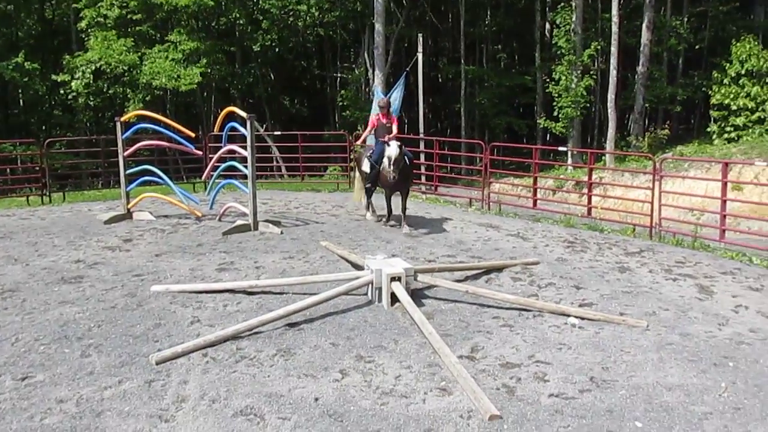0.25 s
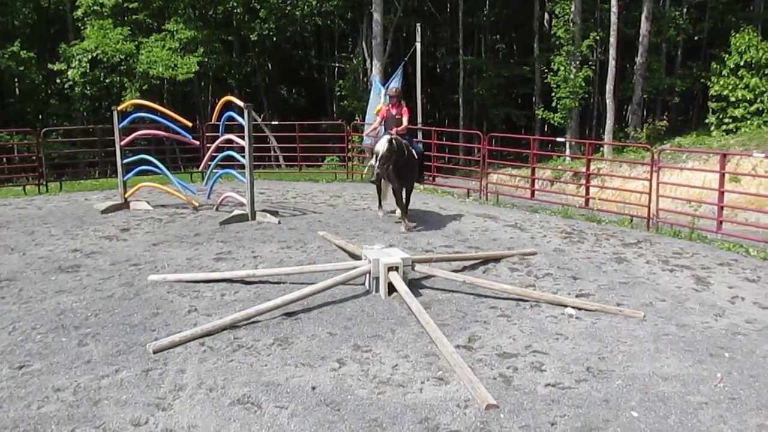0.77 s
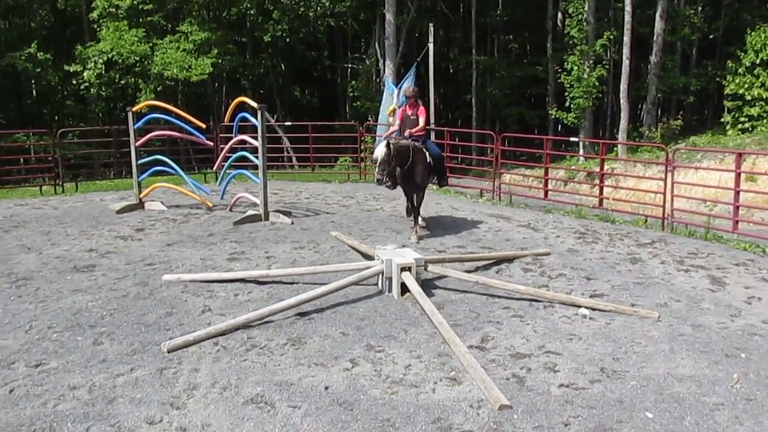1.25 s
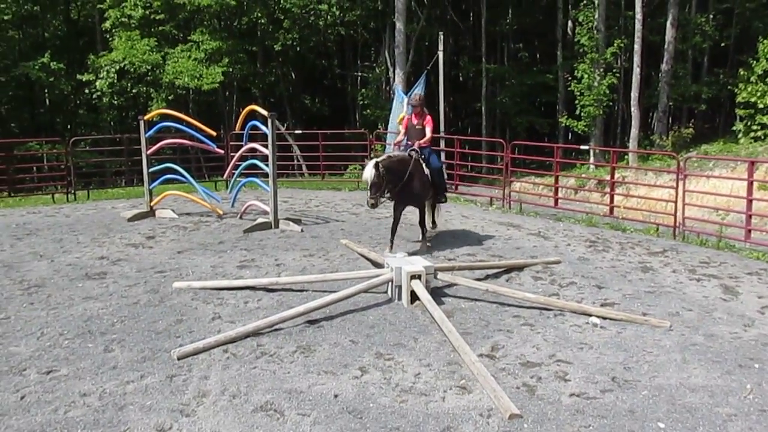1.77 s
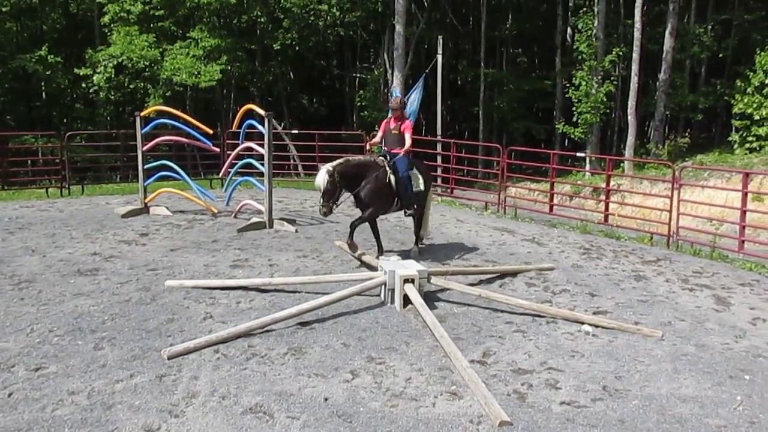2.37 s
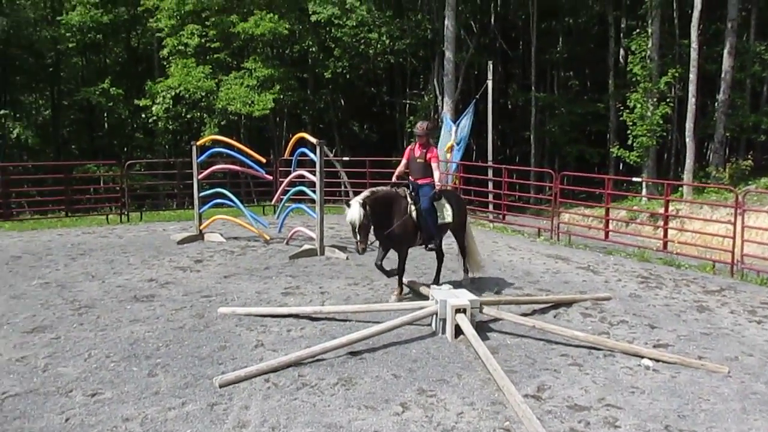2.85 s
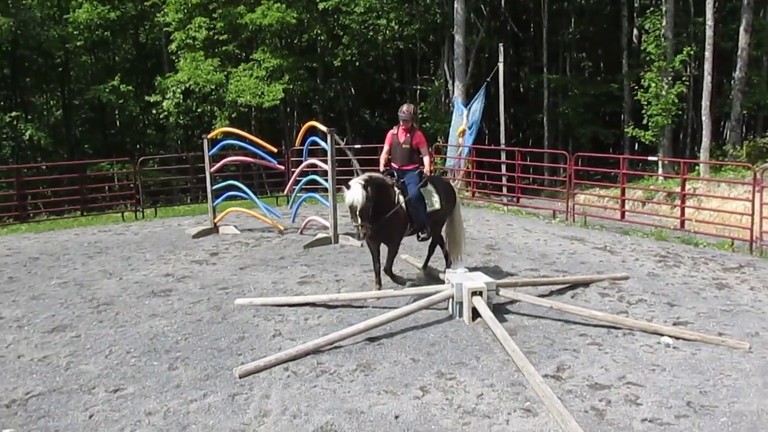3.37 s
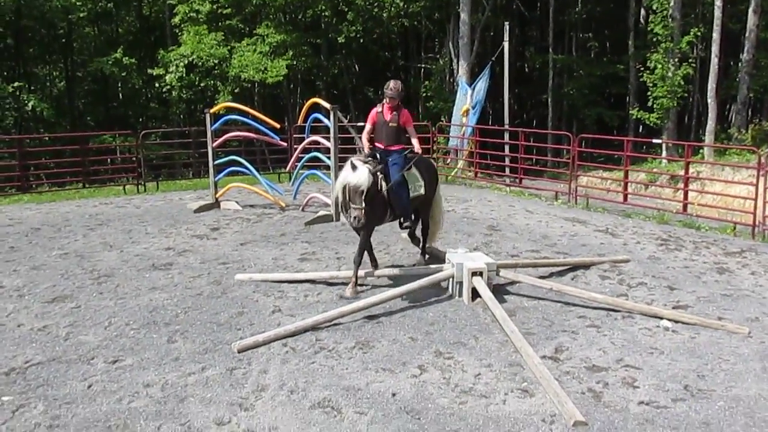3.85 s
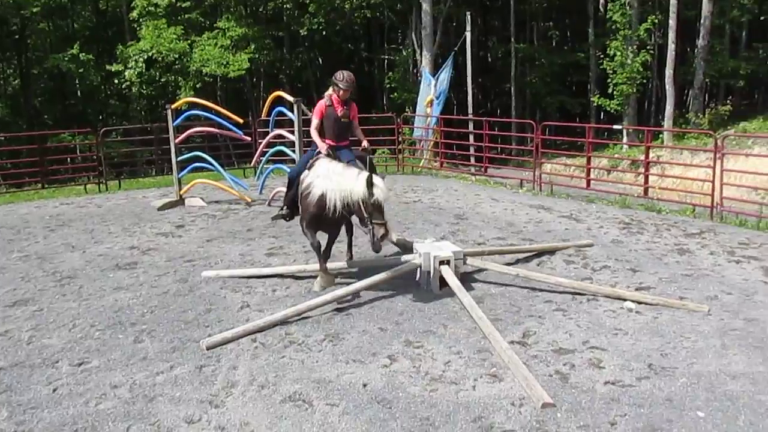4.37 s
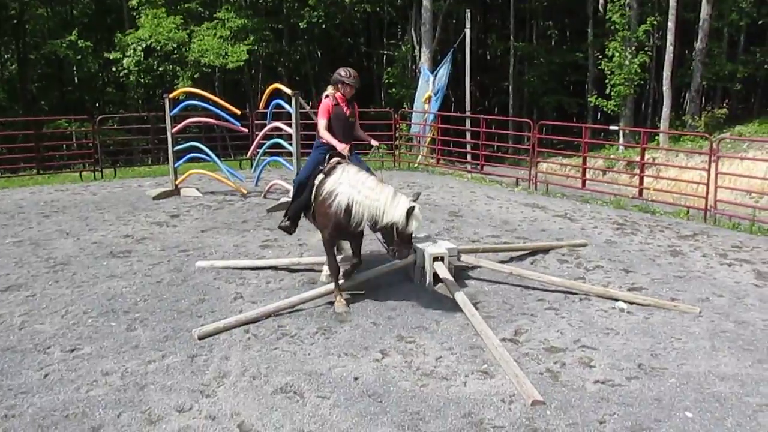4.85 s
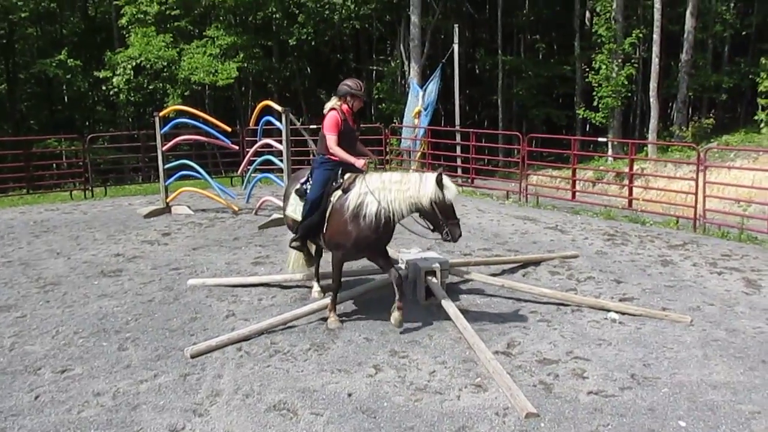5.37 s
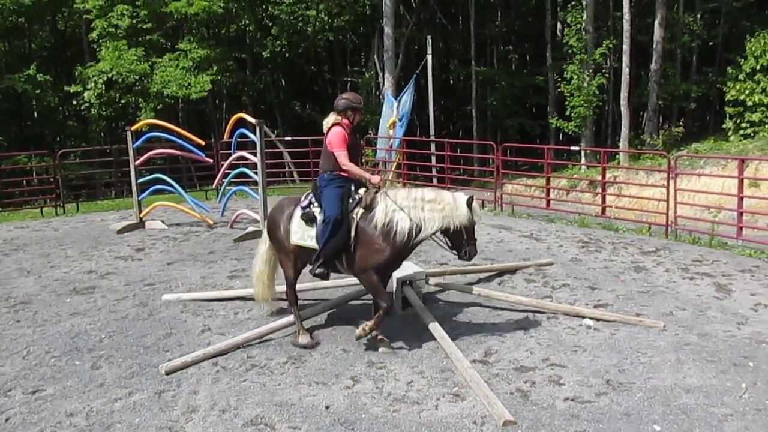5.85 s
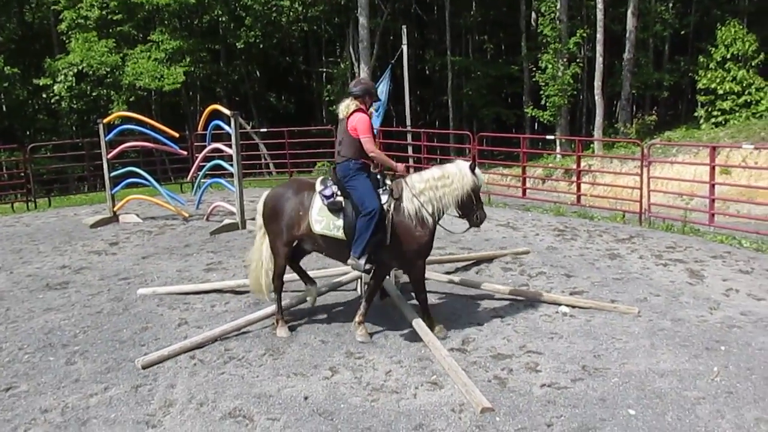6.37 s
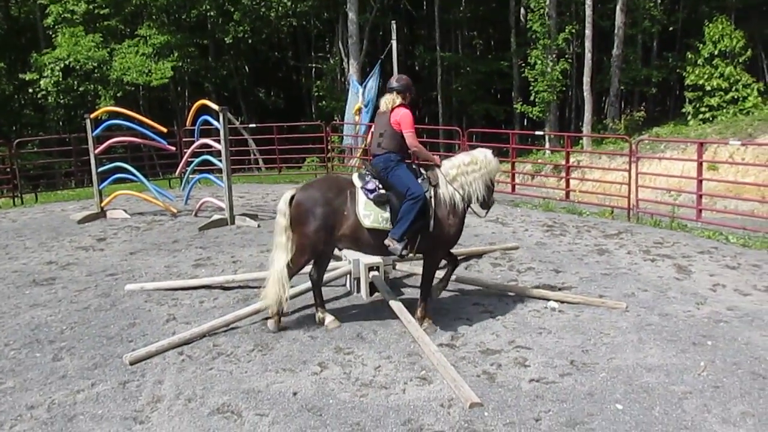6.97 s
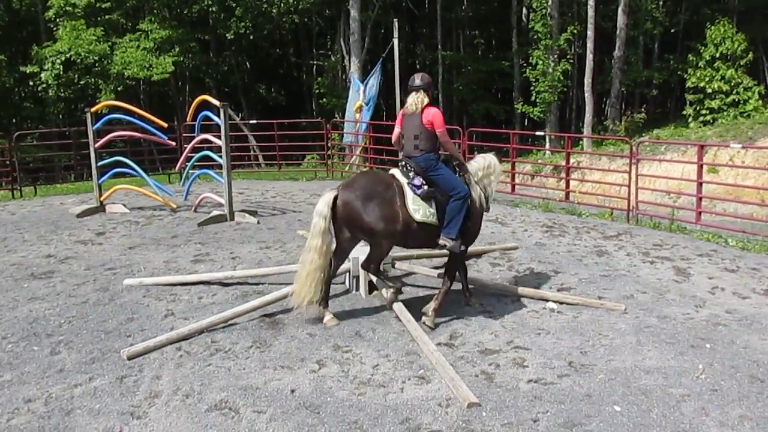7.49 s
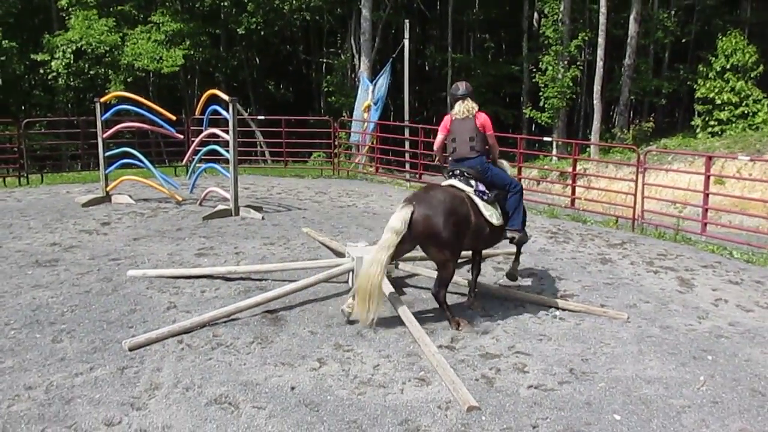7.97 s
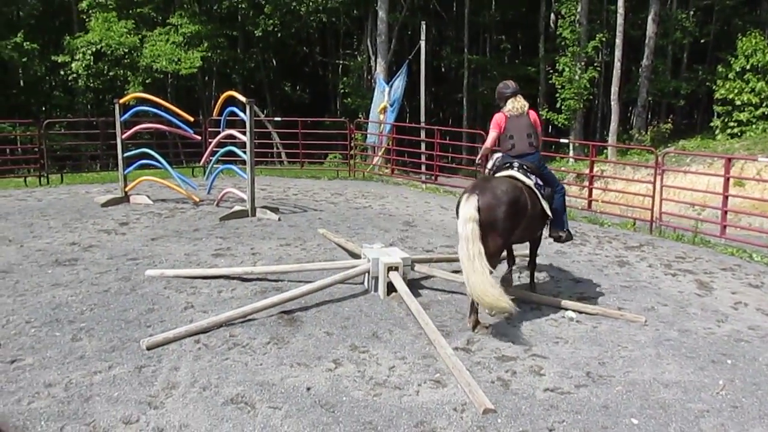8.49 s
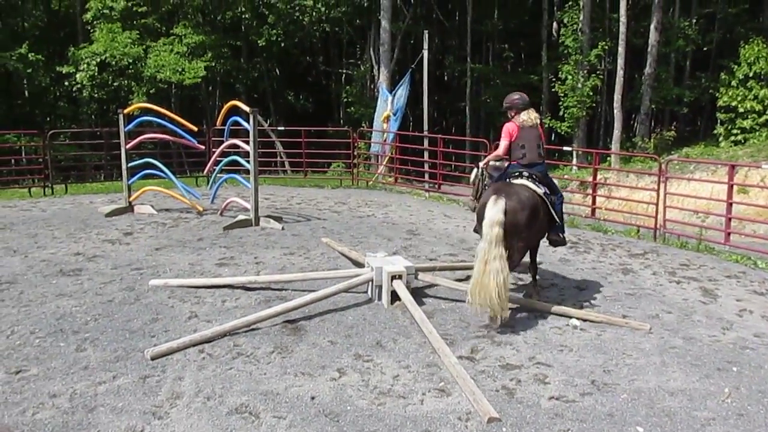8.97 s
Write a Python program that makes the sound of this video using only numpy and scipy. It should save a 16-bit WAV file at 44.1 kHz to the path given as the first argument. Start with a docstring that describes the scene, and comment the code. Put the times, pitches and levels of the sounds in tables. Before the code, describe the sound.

Unhurried hoofsteps crunch in sandy gravel, stones snapping, bridle rings tinkling softly, and a hoof loudly raps a wooden pole late on.

```python
"""Horse walking among poles

A ridden horse walks round a star of wooden poles in an outdoor arena of fine gravel.
Each step sets off a shower of random grains; filtered bursts snap, thuds are decaying tones with noise.
Hooves clop and a few clip a pole, one of them hard: these and the jingling bit, buckle and bridle rings
are sums of decaying modes. The saddle creaks once as a run of pulses, and dragged toes grind.
The trees behind return a soft echo of noise taps; sand, leaves, air and a far motor lie beneath."""
import sys
import numpy as np
from scipy import signal
from scipy.fft import rfft, irfft, next_fast_len
from scipy.io import wavfile

SR = 44100
rng = np.random.default_rng(int(sys.argv[2]) if len(sys.argv) > 2 else 0)


def digitize_waveform(pressure):
    """Quantize a signal to 16-bit integers and store it at the path in sys.argv[1].

    Rows of a 2-D input are taken as channels; values are limited to [-1, 1].
    """
    field = np.atleast_2d(pressure).T
    bounded = np.clip(field, -1, 1)
    quanta = np.round(bounded * 32767).astype(np.int16)
    wavfile.write(sys.argv[1], SR, quanta)


N = 406602
TIME = np.arange(N) / SR
SIZE = next_fast_len(N, real=True)
BINS = np.fft.rfftfreq(SIZE, 1 / SR)

# relative spectrum of trickling sand: freq_hz, level_db
HISS_SPECTRUM = [(1200, -0.5), (2200, 2.5), (4000, -1), (6500, 1.5), (8700, -9), (10500, -40), (16000, -26)]
# relative spectrum of rustling sand and leaves: freq_hz, level_db
RUSTLE_SPECTRUM = [(200, -1.5), (450, -4), (950, -3.5), (1400, -9.5), (2200, -20), (4000, -26.5)]
# relative spectrum of the finest sand: freq_hz, level_db
FINE_SPECTRUM = [(5000, -76), (8500, 6), (10500, 2), (14500, 4.5), (16000, -15.5)]
# change in level of the finest spray, which dulls as the horse turns away: time_s, level_db
SPRAY_LEVEL = [(0, 0), (2.2, 4), (3.3, 6.5), (4.7, -2), (5.9, 3), (6.9, -4.5), (7.9, -1), (8.1, -13)]
# modes of a bridle ring: freq_hz, level_db, t60_s (before the length factor of ring)
BRIDLE_MODES = [(12670, -1.5, 0.16), (13500, -6, .14), (13950, -20, .08), (8720, -8, 0.037)]
# level of a usual step, against which the others count as hard or light
USUAL_DB = -38.5


def amp(db):
    """Amplitude ratio: twenty decibels to each factor of ten."""
    return 10 ** (np.asarray(db) / 20)


def evened(x):
    """Power normalisation: scales to an rms of one."""
    return x / np.sqrt(np.mean(x ** 2) + 1e-20)


def read(points, hz):
    """Logarithmic frequency scale: joins (Hz, value) points along it."""
    f, value = np.transpose(points)
    return np.interp(np.log(hz + 1), np.log(f + 1), value)


def along(curve):
    """Linear interpolation: joins (s, value) points over the whole scene."""
    return np.interp(TIME, *np.transpose(curve))


def add(mix, s, sound):
    """Superposition: mixes a sound in at time s."""
    part = mix[..., max(round(s * SR), 0):][..., :sound.shape[-1]]
    part += sound[..., :part.shape[-1]]


def drift(per_s):
    """Low-pass noise: a slow random fluctuation of rms one."""
    lowpass = np.exp(-(BINS / per_s) ** 2)
    return evened(irfft(rfft(rng.standard_normal(SIZE)) * lowpass, SIZE)[:N])


def coloured(drive, spectrum):
    """Coherence: filters two unrelated drives and shares them so the two ports are partly alike."""
    # left-right likeness of the ports: freq_hz, likeness (0-1)
    likeness = [(25, 0.45), (60, 0.65), (150, 0.76), (500, 0.57), (1000, 0.7), (2000, 0.39), (4000, 0.32),
                (8000, 0.37), (14000, 0.21)]
    a, b = rfft(drive, SIZE)
    same = np.clip(read(likeness, BINS), 0, 1)
    mid, side = a * np.sqrt(1 + same), b * np.sqrt(1 - same)
    ports = np.array([mid + side, mid - side])
    return evened(irfft(ports * amp(read(spectrum, BINS)), SIZE)[:, :N])


def grains(per_s, spread_db):
    """Poisson-like impulses: random clicks of stones, most small, a few large."""
    size = amp(spread_db * np.minimum(rng.exponential(1, N), 4))
    struck = rng.random(N) < per_s / SR
    return rng.standard_normal((2, N)) * size * struck


def ring(modes, t, length=0.58):
    """Modal superposition: after one blow each mode decays; length multiplies every t60."""
    return sum(amp(db - 60 * t / (t60 * length)) * np.sin(2 * np.pi * hz * t)
               for hz, db, t60 in modes)


def swell(rise, t60):
    """Attack and decay: a straight rise, then an exponential fall."""
    u = TIME[:SR]
    return np.minimum(u / max(rise, 1e-3), 1) * amp(-60 * np.maximum(u - rise, 0) / t60)


def background(rustle_db=-53.0, hiss_db=-60, fine_db=-72, rumble_db=4.0, gust_db=2.0,
               flicker_db=3.0, waver_hz=3.2, throb_db=3):
    """Filtered noise and frequency modulation: sand and leaves, rumbling air, a wavering far motor."""
    # relative spectrum of the rumbling air: freq_hz, level_db
    air_spectrum = [(10, -28), (25, -1), (33, -4.5), (41, 10), (50, -1.5), (100, 1), (190, -6), (300, -10),
                    (500, -20), (1000, -24), (3000, -72)]
    # low outdoor rumble before rumble_db and the gusts: time_s, level_db
    rumble_level = [(0.0, -51), (4.8, -49), (5.29, -53), (6.37, -49.5), (6.78, -49), (9.04, -50.5),
                    (9.22, -51.5)]
    # far motor before its throb: time_s, level_db (rms)
    motor_level = [(0, -78), (5.3, -66), (5.8, -50.5), (7.2, -47.5), (9.22, -48.5)]
    # change in level of the steady rustle and hiss: time_s, level_db
    bed_level = [(0, 2), (1.6, 1), (3.2, 3), (5.3, 0.5), (6.6, 2), (7.2, 0.5), (9.22, 0.5)]
    motor_hz = 106.3  # centre of the wavering line

    rustle = coloured(grains(per_s=6000, spread_db=0.5), RUSTLE_SPECTRUM)
    rustle *= amp(rustle_db + flicker_db * drift(21))
    trickle = grains(per_s=20000, spread_db=4.5)
    hiss = coloured(trickle, HISS_SPECTRUM) * amp(hiss_db)
    hiss += coloured(trickle, FINE_SPECTRUM) * amp(fine_db)
    air = coloured(rng.standard_normal((2, N)), air_spectrum)
    air *= amp(along(rumble_level) + rumble_db + gust_db * drift(8.5))
    turns = np.cumsum(motor_hz + waver_hz * drift(4.75)) / SR
    motor_gain = np.sqrt(2) * amp(along(motor_level) + throb_db * drift(3.9))
    motor = motor_gain * np.sin(2 * np.pi * turns)
    return (rustle + hiss) * amp(along(bed_level)) + air + motor


def tack(hits, modes, level_db, vary_db=4, detune=.004):
    """Modal excitation: small metal parts ring, each touch favouring other modes at each port."""
    out, t = np.zeros((2, N)), TIME[:SR // 3]
    onset = 1 - np.exp(-t / 0.00025)
    for s, db in hits:
        for port in out:
            touched = [(hz * (1 + detune * rng.standard_normal()),
                        mode_db + vary_db * rng.standard_normal(), t60)
                       for hz, mode_db, t60 in modes]
            add(port, s, amp(db + level_db) * ring(touched, t) * onset)
    return out


def jostling(count=130, quiet_db=-45.0, spread_db=4):
    """Random excitation: faint chance touches of the bridle rings as the head nods."""
    # how busily the bridle shakes: time_s, chance of a faint touch (0-1)
    shaking = [(0, .2), (2.6, .04), (3.1, .25), (5.3, .7), (5.6, .08), (8.9, .03), (9.2, .6)]
    place, luck, size = rng.random((count, 3)).T
    s = (np.arange(count) + place) * N / SR / count
    touches = np.transpose([s, quiet_db + spread_db * (2 * size - 1)])
    happens = luck < np.interp(s, *np.transpose(shaking))
    return tack(touches[happens], BRIDLE_MODES, level_db=-5.0)


def footwork():
    """Contact timing: every touch of a hoof as (s, rise s, t60 s, crunch dB, fineness dB)."""
    # hooves landing in the gravel: start_s, crunch_db, fineness_db (of the footing)
    landings = [(0.083, -49.5, 11), (0.373, -49, 7), (2.163, -56.5, 2.5), (2.519, -46, -2),
                (3.112, -48, -2.5), (3.285, -54.5, -0.5), (3.318, -52.5, 2), (3.455, -53.5, -1),
                (4.075, -53, -1.5), (4.626, -38, 8), (4.79, -45.5, 4.5), (4.887, -49, 7), (5.822, -34.5, 5),
                (6.317, -42, 1.5), (6.569, -45.5, 5), (6.728, -53, 6.5), (7.47, -43.5, -17),
                (7.877, -33.5, 4.5)]
    # hooves pushing off through the gravel: start_s, length_s, crunch_db, fineness_db
    drags = [(0.602, 0.05, -49.5, 2), (0.938, 0.055, -58.5, -4.5), (1.228, .025, -52.5, 4),
             (1.4, 0.032, -57.5, -6), (1.496, 0.031, -55, -1), (2.021, 0.029, -60, -4),
             (2.44, 0.037, -51.5, -5), (2.613, 0.0031, -53, -5), (3.793, 0.011, -41.5, 0.5),
             (4.644, 0.069, -47, -2), (4.836, 0.028, -50, 6), (5.498, 0.047, -45, 2),
             (5.646, 0.068, -46.5, -0.5), (5.73, 0.026, -48, -0.5), (7.323, 0.0096, -47, 3),
             (7.717, 0.13, -49.5, 0), (8.095, 0.034, -47.5, 10.5), (8.317, .049, -55, 4),
             (8.486, 0.024, -53, 6), (8.894, 0.0087, -55.5, 4)]
    land_rise_s, usual_t60_s, packing = 0.0062, 0.14, 0.37
    drag_t60_s = 0.1  # the crunch ends quickly once the hoof is clear
    steps = []
    for s, db, fineness in landings:
        # a harder landing packs the gravel and stops sooner
        t60 = usual_t60_s * amp(-packing * (db - USUAL_DB))
        steps.append((s, land_rise_s, t60, db, fineness))
    return steps + [(s, length, drag_t60_s, db, fineness) for s, length, db, fineness in drags]


def gravel(crunch_db=3.5, scuff_db=4.0, fine_db=-5, clump_db=2):
    """Granular impact noise: a spray of fine sand, bright cracks and duller grinding at each hoof."""
    # relative spectrum of the bright cracks: freq_hz, level_db
    crunch_spectrum = [(700, -17), (1500, 6.5), (2400, 1), (3500, 4), (4300, -2.5), (5300, 4.5),
                       (7000, 3.5), (8700, -7), (10500, -21), (16000, -29)]
    # relative spectrum of the grinding beneath: freq_hz, level_db
    scuff_spectrum = [(60, 6), (180, 10), (400, 0), (850, 4), (1400, -10.5), (2100, -9.5), (3500, -15),
                      (8000, -25.5), (16000, -38)]
    step_scuff_db, scuff_per_fineness = 5.5, -0.87  # finer footing grinds less

    crunch, scuff, fine = np.zeros((3, N))  # powers, so that overlapping steps add as noise does
    for s, rise, t60, db, fineness in footwork():
        push = amp(db) * swell(rise, t60)
        add(crunch, s, push ** 2)
        add(scuff, s, (push * amp(step_scuff_db + scuff_per_fineness * fineness)) ** 2)
        add(fine, s, (push * amp(fineness)) ** 2)
    clumps = amp(clump_db * drift(147))  # stones give way in bunches
    stones = grains(per_s=9000, spread_db=0.5)
    top = coloured(stones, crunch_spectrum) * np.sqrt(crunch) * amp(crunch_db)
    spray = coloured(stones, FINE_SPECTRUM) * np.sqrt(fine) * amp(fine_db + along(SPRAY_LEVEL))
    grinding = coloured(grains(per_s=3000, spread_db=3.0), scuff_spectrum)
    under = grinding * np.sqrt(scuff) * amp(scuff_db)
    return (top + spray + under) * clumps


def settling(hiss_db=2.5, rustle_db=4, fine_db=-5):
    """Granular relaxation: sand runs back into each print, more of it after a heavy step."""
    usual_flow_db, flow_per_db = -62, 0.58
    flow_rise_s, flow_t60_s = 0.081, 1.77
    coarse, fine = np.zeros((2, N))  # powers
    for s, rise, _, db, fineness in footwork():
        flow = amp(usual_flow_db + flow_per_db * (db - USUAL_DB)) * swell(flow_rise_s, flow_t60_s)
        add(coarse, s + rise, flow ** 2)
        add(fine, s + rise, (flow * amp(fineness)) ** 2)
    sand = grains(per_s=18000, spread_db=5.5)
    body = coloured(sand, HISS_SPECTRUM) * amp(hiss_db)
    body += coloured(grains(per_s=6000, spread_db=2.0), RUSTLE_SPECTRUM) * amp(rustle_db)
    top = coloured(sand, FINE_SPECTRUM) * np.sqrt(fine) * amp(fine_db + along(SPRAY_LEVEL))
    return body * np.sqrt(coarse) + top


def woods(x, near_db=-19, near_t60=0.15, far_db=-25, far_t60=1.15):
    """Diffuse reflection: quick scatter from ground and fence, then a faint long echo from the trunks."""
    # relative echo colour: freq_hz, level_db
    echo_spectrum = [(100, -13), (300, 0), (700, 7), (1200, 4), (2500, 10), (8000, 5), (16000, -21.5)]
    taps = coloured(grains(per_s=4400, spread_db=7.5), echo_spectrum)[:, :SR]
    t = TIME[:SR]
    near = amp(-60 * t / near_t60) * (t > .006)
    far = amp(-60 * t / far_t60) * np.minimum(t / 0.056, 1)
    envelope = amp(near_db) * evened(near) + amp(far_db) * evened(far)
    tail = taps * envelope / np.sqrt(SR)
    return signal.fftconvolve(x.mean(0)[None], tail, axes=1)[:, :N]


def buckle():
    """Modal ringing: a buckle pings."""
    # pings before the level_db below: start_s, level_db
    pings = [(.698, -36)]
    # modes of the buckle: freq_hz, level_db, t60_s (before the length factor of ring)
    buckle_modes = [(6750, -8, 0.065), (13940, -5, 0.4), (14600, -10, .2)]
    return tack(pings, buckle_modes, level_db=1.5)


def bridle_rings():
    """Modal ringing: the louder touches of the bridle rings."""
    # touches before the level_db below: start_s, level_db
    jingles = [(0.7946, -47), (3.0026, -43), (3.1048, -42), (4.0866, -41), (4.3859, -42), (4.462, -39),
               (4.7481, -40), (5.3028, -45), (6.8044, -34), (9.0818, -41)]
    return tack(jingles, BRIDLE_MODES, level_db=-1)


def pebbles(count=14, quiet_db=-48, spread_db=2, low_hz=4000, high_hz=9000, within_s=0.38):
    """Random secondary impacts: stones kicked up shortly after chance steps, as (s, dB, centre Hz)."""
    steps = rng.choice([row[0] for row in footwork()], count)
    late, size, pitch = rng.random((count, 3)).T
    level_db = quiet_db + spread_db * (2 * size - 1)
    return list(zip(steps + within_s * late, level_db, low_hz + (high_hz - low_hz) * pitch))


def snaps(t60=0.025, spread=0.37):
    """Band-limited impact: a stone cracks against its neighbours in a short burst around one pitch."""
    # the larger stones snapping under a hoof: start_s, level_db, centre_hz
    large_stones = [(1.115, -40.5, 6370), (1.129, -41, 2250), (1.682, -36, 7140), (2.255, -44, 6800),
                    (2.945, -38, 2240), (2.946, -35.5, 7650), (3.247, -39.5, 7140), (3.523, -41, 2880),
                    (3.6585, -28.5, 5960), (5.7558, -32.5, 4160), (6.484, -40, 1590), (6.788, -41.5, 7960),
                    (7.476, -27.5, 6170), (7.638, -43.5, 6700), (7.882, -26.5, 7600)]
    out, t = np.zeros((2, N)), TIME[:SR // 10]
    for s, db, hz in large_stones + pebbles():
        edges_hz = [hz * 0.58, min(hz * 1.4, SR * .45)]
        band = signal.butter(4, edges_hz, "bandpass", fs=SR, output="sos")
        mid, side = evened(signal.sosfilt(band, rng.standard_normal((2, len(t)))))
        burst = np.array([mid + spread * side, mid - spread * side])
        add(out, s, burst * amp(db - 60 * t / t60))
    return out


def bit():
    """Modal ringing: the bit clinks."""
    # clinks before the level_db below: start_s, level_db
    clinks = [(1.138, -43), (1.1505, -32)]
    # modes of the bit: freq_hz, level_db, t60_s (before the length factor of ring)
    bit_modes = [(5210, -7, 0.052), (6950, -4, .03), (7450, 0.5, 0.062), (9670, -2, 0.042),
                 (15400, -2, .09)]
    return tack(clinks, bit_modes, level_db=2.5)


def clops():
    """Hollow-body resonance: the hoof rings briefly, lower when it lands flat."""
    # a hoof wall clacking on something hard: start_s, level_db, pitch (factor)
    clacks = [(1.527, -42, .6), (2.616, -39, .75), (3.117, -34, .6), (3.159, -31, .8), (3.418, -33, .85),
              (5.757, -22, 1.), (6.831, -41, .5), (7.398, -33.5, .75), (8.216, -39, .72), (8.322, -37, .68)]
    # modes of the hoof before pitch and length factors: freq_hz, level_db, t60_s
    hoof_modes = [(581, -9, .06), (894, -4, .04), (1370, 0, .055), (1530, -2, .045), (1712, -7, .045)]
    out, t = np.zeros(N), TIME[:SR // 6]
    onset = 1 - np.exp(-t / .0008)
    for s, db, pitch in clacks:
        # scaling time lowers the pitch and lengthens the ring together
        add(out, s, amp(db) * ring(hoof_modes, t * pitch) * onset)
    return out


def thuds(loose=0.3, soft_s=0.00042, t60_s=0.059):
    """Damped oscillation: the ground swings a few times under the hoof and loose footing rattles."""
    # weight coming down on the packed base: start_s, level_db, pitch_hz
    footfalls = [(2.138, -31, 370), (2.529, -24.5, 131), (3.160, -30, 380), (3.171, -22, 203),
                 (3.334, -24, 151), (3.385, -30, 135), (3.459, -31.5, 171), (3.665, -14, 299),
                 (3.799, -26, 158), (4.639, -20, 167), (4.644, -25.5, 356), (4.795, -23.5, 195),
                 (4.894, -20.5, 256), (4.915, -21.5, 220), (4.962, -25.5, 277), (4.982, -22.5, 247),
                 (5.765, -24, 292), (5.825, -29, 228), (6.321, -27, 196), (7.881, -20.5, 83),
                 (7.8891, -12, 110), (8.124, -26, 104)]
    out, t = np.zeros(N), TIME[:SR // 4]
    onset = 1 - np.exp(-t / soft_s)
    for s, db, hz in footfalls:
        band = signal.butter(2, [hz * 0.56, hz * 3], "bandpass", fs=SR, output="sos")
        rattle = evened(signal.sosfilt(band, rng.standard_normal(len(t))))
        swing = np.sin(2 * np.pi * hz * t)
        add(out, s, amp(db - 60 * t / t60_s) * onset * (swing + loose * rattle))
    return out


def saddle(leather_hz=370, width_s=0.0023, jitter_s=0.0019, count=6):
    """Stick-slip friction: leather slips in a run of dull pulses that grows louder."""
    start_s, slip_gap_s = 2.715, 0.017
    last_db, swell_db = -27, 2
    out, u = np.zeros(N), TIME[:SR // 50] - .01  # time about the centre of a pulse
    pulse = np.exp(-(u / width_s) ** 2) * np.cos(2 * np.pi * leather_hz * u)
    for k in range(count):
        s = start_s + k * slip_gap_s + jitter_s * rng.standard_normal()
        db = last_db - swell_db * (1 - k / (count - 1)) ** 2
        add(out, s + u[0], amp(db) * pulse)
    return out


def poles(bounce_s=0.00424, bounce=0.25, chatter_db=-3, chatter_t60=.09, low_hz=125):
    """Struck-bar modes: a hoof hits the wood and rebounds once; the pole chatters on the gravel."""
    # hoof against a pole, and the pole rocking back: start_s, level_db, hardness_hz (cut-off), length (factor)
    knocks = [(3.664, -37.5, 600, 1), (4.64, -33, 785, 0.56), (4.895, -37, 900, 0.97),
              (7.4739, -12, 1110, 0.7), (7.624, -43.5, 700, .7), (7.74, -42, 694, 0.63),
              (7.813, -42, 1160, 0.3)]
    # modes of a pole before the length factor: freq_hz, level_db, t60_s
    pole_modes = [(150, -4, .06), (175, -3, .12), (226, -7, .1), (296, 1.5, .15), (414, -2, .11),
                  (458, 1, .14), (505, -4, .08), (562, -1, .15), (705, -5, .2), (762, -10, .14),
                  (824, -3, .07), (910, 0, .11), (1139, -9, .13), (1346, -4, .11), (1400, -7, .05),
                  (1717, -11, .08), (2420, -18, .07), (2907, -5, .1), (3150, -3, .06)]
    out, t = np.zeros(N), TIME[:SR // 2]
    band = signal.butter(2, [280, 900], "bandpass", fs=SR, output="sos")
    for s, db, hard_hz, length in knocks:
        wood = ring(pole_modes, t, length)
        add(wood, bounce_s, bounce * ring(pole_modes, t, length / 2))
        chatter = evened(signal.sosfilt(band, rng.standard_normal(len(t))))
        wood += chatter * amp(chatter_db - 60 * t / (chatter_t60 * length))
        softened = signal.sosfilt(signal.butter(2, hard_hz, fs=SR, output="sos"), wood)
        add(out, s, amp(db) * softened)
    # a thin pole radiates little bass
    return signal.sosfilt(signal.butter(4, low_hz, "highpass", fs=SR, output="sos"), out)


def scrapes(rough_db=0.0):
    """Sliding friction: a dragged toe grinds over stones in a narrow band, swelling and fading."""
    # a toe dragged along the ground: start_s, length_s, level_db, centre_hz
    toe_drags = [(5.246, 0.12, -49.5, 885), (6.284, 0.31, -48, 1460), (8.184, 0.23, -52.5, 900),
                 (8.781, 0.17, -52.5, 1010)]
    out = np.zeros((2, N))
    stones = grains(per_s=3500, spread_db=0.5) * amp(rough_db * drift(52))
    for s, length, db, hz in toe_drags:
        spectrum = [(hz / 4, -24), (hz / 2, -10), (hz, 0), (hz * 2, -10), (hz * 8, -40)]
        grind = coloured(stones, spectrum)
        stroke = signal.windows.tukey(round(length * SR), .5)
        add(out, s, amp(db) * stroke * grind[:, round(s * SR):][:, :len(stroke)])
    return out


def scene():
    """Superposition: the horse and its tack, their echo, and the open air."""
    hooves = gravel() + scrapes() + thuds() + poles() + clops() + snaps()
    ground = settling() + background()
    horse = hooves + saddle() + bit() + buckle() + bridle_rings()
    return horse + woods(horse) + ground + jostling()


def record(dry):
    """Transduction: two ports of different colour, soft saturation of the peaks, then a band limit."""
    # difference in colour of the ports: freq_hz, left_minus_right_db
    lean = [(60, 3.5), (300, 0), (600, 0.5), (2000, -1), (4500, -1), (6300, -0.5), (8000, 2), (10000, 4),
            (13000, 1)]
    edge_hz = 15950
    lean_db = read(lean, BINS) * np.array([[.5], [-.5]])
    ports = irfft(rfft(dry, SIZE) * amp(lean_db), SIZE)[:, :N]
    ports = ports / (1 + ports ** 4) ** .25
    lowpass = signal.firwin(511, edge_hz, window=("kaiser", 9), fs=SR)
    return signal.oaconvolve(ports, lowpass[None], "same")


dry = scene()
out = record(dry)
digitize_waveform(out)
```